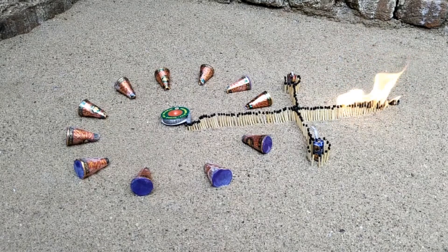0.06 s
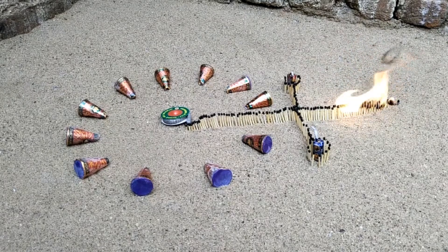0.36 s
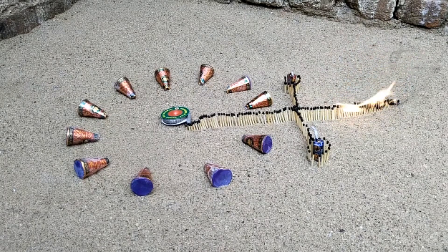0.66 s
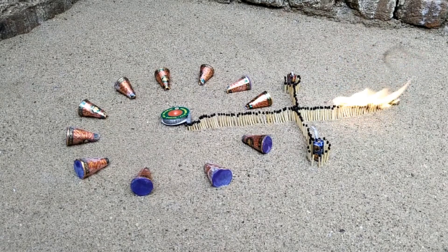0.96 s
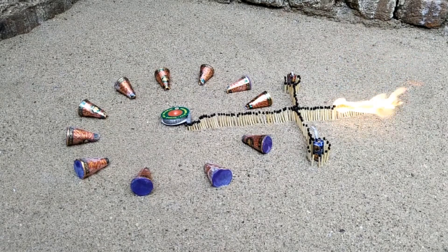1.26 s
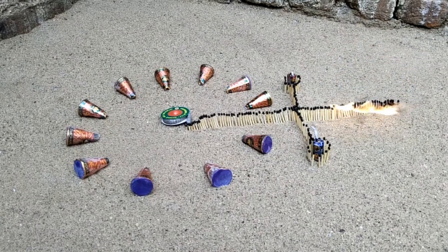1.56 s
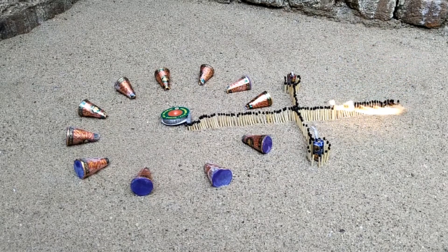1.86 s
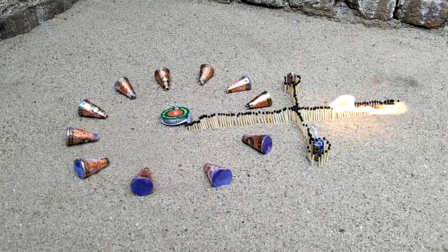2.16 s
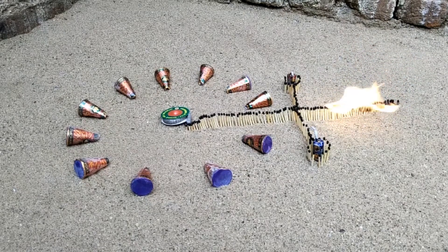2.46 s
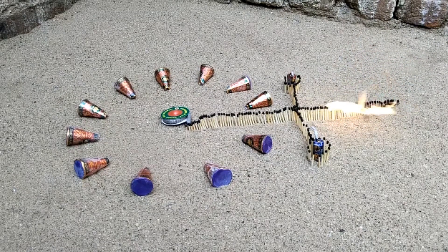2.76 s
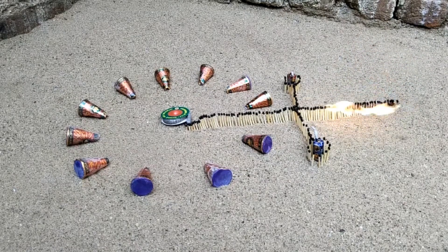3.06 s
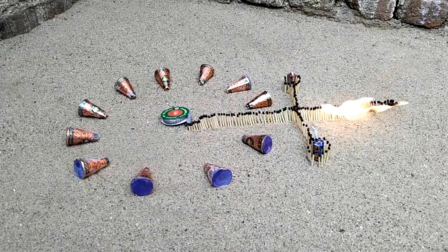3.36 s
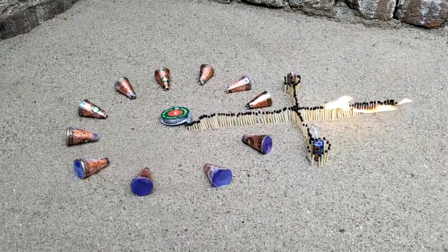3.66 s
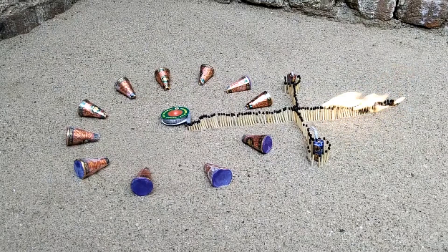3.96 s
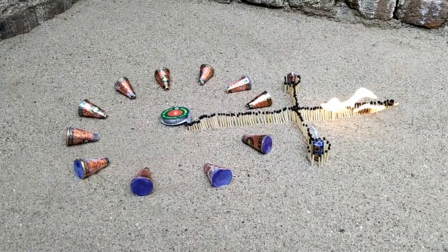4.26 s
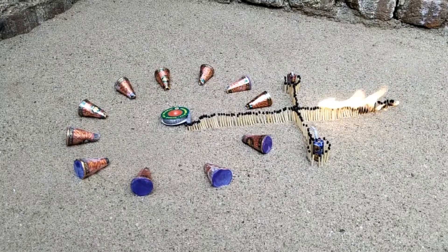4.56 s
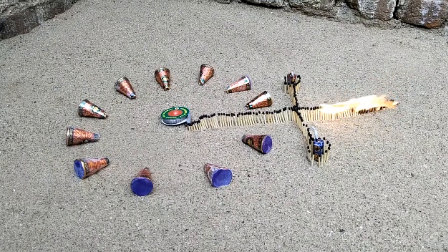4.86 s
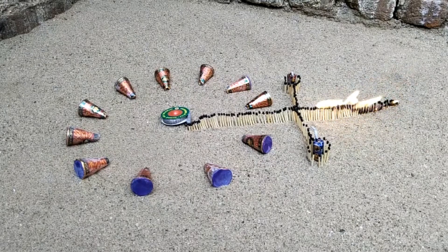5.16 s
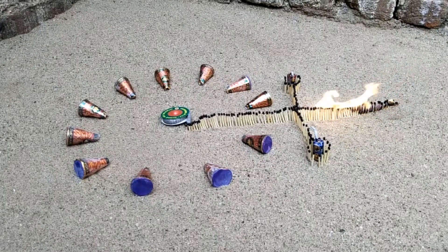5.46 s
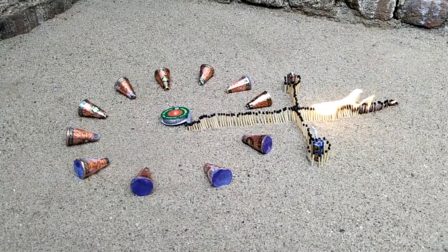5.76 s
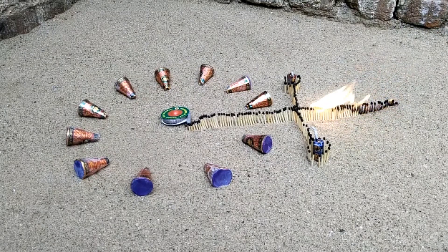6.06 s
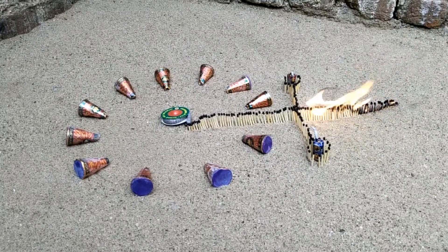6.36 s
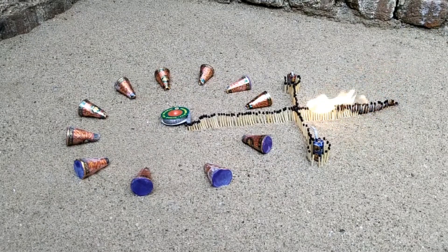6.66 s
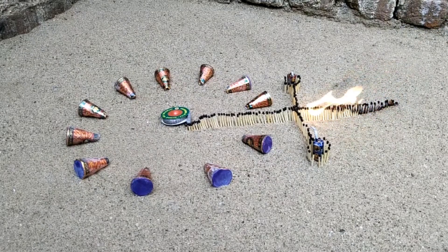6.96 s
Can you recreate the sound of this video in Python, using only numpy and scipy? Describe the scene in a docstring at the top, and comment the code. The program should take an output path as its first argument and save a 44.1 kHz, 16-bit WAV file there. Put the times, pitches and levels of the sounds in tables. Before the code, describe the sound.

A row of matches burns along on sand outdoors. Each head catches with a small whoosh and a bright, fluttering fizz, then fades as the next one flares, about twice a second. Short spurts of gas, sharp little snaps and a few faint, very brief whistles break up the hiss. The snaps grow more frequent in the second half. A light wind rumbles on the nearby microphone throughout.

```python
"""Match heads flare and fizz one after another, a row of them burning along on sand, outdoors.
Each flaring head blows a jet of gas while its coating boils off in tiny bursts; pockets of gas
spurt out, cracks whistle and crusts snap. The sand and hard surfaces close by add early echoes.
A light wind rumbles underneath, and the microphone's port rings near 9 kHz."""
import sys
import numpy as np
from scipy import signal
from scipy.fft import rfft, irfft
from scipy.io import wavfile
from scipy.ndimage import map_coordinates

SR = 44100
rng = np.random.default_rng(int(sys.argv[2]) if len(sys.argv) > 2 else 0)


def generate_wav(signal):
    """Clip the signal to [-1, 1] and save it as 16-bit WAV at the path in sys.argv[1]."""
    frames = np.transpose(np.atleast_2d(signal))
    scaled = np.clip(frames, -1, 1) * 32767
    pcm = np.round(scaled).astype(np.int16)
    wavfile.write(sys.argv[1], SR, pcm)


N = 309582
TIME = np.arange(N) / SR

# The open air around the microphone. Each row: frequency in Hz, relative level in dB.
AIR_SPECTRUM = [(8, 1.5), (14, 0), (24, 0), (38, -4.5), (60, -11.5), (90, -13), (160, -16), (300, -18),
                (700, -29.5), (2000, -39.5), (6000, -46.5), (16000, -56)]
# Gusts of the breeze. Each row: centre in seconds, half length in seconds, lift in dB.
WIND_GUSTS = [(0.604, 0.064, 5), (1.04, 0.2, 8), (2.465, 0.11, 5.5), (3.015, 0.13, 3.5), (4.7, 0.068, 1.5),
              (5.68, 0.055, 5.5)]
# Echo paths to the microphone, shifting as the flame travels. Each row: time in seconds,
# delay off the sand in ms, then the delays off three hard surfaces close by in ms.
ECHO_DELAYS = [(0, .93, 2.08, 3.05, 4.19), (1.15, .93, 2.15, 3.04, 4.2), (2.3, .935, 2.215, 3.04, 4.16),
               (4.4, .915, 2.232, 3.005, 4.185), (7, .85, 2.241, 2.935, 4.178)]
# Rough stone scatters mostly treble. Each row: frequency in Hz, relative level in dB.
STONE_SPECTRUM = [(200, -29), (1500, 1), (4000, 4.5), (8000, 1), (16000, 5.5)]
# The resonance of the microphone's port. Each row: frequency in Hz, gain in dB.
MIC_RESPONSE = [(4000, 0), (5200, 2), (6200, 7), (7300, 12), (8400, 17.5), (9200, 18.5), (10000, 12),
                (10800, 8.5), (12000, 9.5), (15500, 0.5)]

# Gas whistling through cracks.
# Each row: start in seconds, length in seconds, first pitch in Hz, last pitch in Hz, level in dB.
CRACK_WHISTLES = [(0.172, 0.025, 2370, 2440, -61.5), (2.89, 0.039, 6000, 6100, -72),
                  (3.137, 0.031, 4600, 4600, -68.5), (4.315, 0.042, 3800, 3820, -71),
                  (4.804, 0.0615, 3100, 3850, -72), (5.042, 0.023, 2810, 3100, -79)]
# Single sharp snaps of a head's crust. Each row: start in seconds, level in dB.
CRUST_SNAPS = [(0.4254, -40.3), (0.7258, -40), (0.7515, -41.4), (1.5873, -42), (1.6054, -43), (2.001, -39),
               (2.6296, -42.2), (2.7287, -40.6), (3.1405, -43), (3.4001, -37.4), (3.5685, -39.2),
               (3.9691, -38.6), (4.1, -35.4), (4.2326, -36.9), (4.2821, -35.5), (4.3166, -38.3),
               (4.3342, -41.4), (4.7127, -39.5), (4.8461, -35), (5.0381, -49), (5.0749, -47.5),
               (5.0839, -45), (5.2639, -36.8), (5.9455, -36), (5.9835, -34.7), (6.1705, -35.5),
               (6.2251, -35.4), (6.3799, -42), (6.5095, -47), (6.6751, -36.8)]
# Pockets of gas blowing out of a head. Each row: start in seconds, length in seconds, level in dB.
GAS_POCKETS = [(0.434, 0.025, -62.5), (0.525, 0.018, -61.5), (0.599, 0.009, -61.5), (0.68, 0.0073, -64.5),
               (0.717, 0.059, -65.5), (0.805, 0.043, -61.5), (1.47, 0.016, -60.5), (1.514, 0.015, -61.5),
               (1.548, 0.011, -59.5), (1.582, 0.028, -66.5), (1.667, 0.0087, -72), (1.747, .006, -72.5),
               (1.816, 0.0034, -69), (1.852, .004, -71), (1.869, .005, -65), (1.999, 0.038, -57),
               (2.701, 0.01, -55.5), (2.762, 0.013, -57.5), (2.788, .016, -59), (3.115, 0.052, -60),
               (3.185, 0.025, -62), (3.548, .02, -57), (3.603, 0.043, -62.5), (3.664, 0.0057, -56.5),
               (3.67, 0.028, -66.5), (3.718, 0.0091, -69), (3.812, .0058, -67), (4.292, 0.016, -56.5),
               (4.384, .015, -62.5), (4.411, 0.0072, -59), (4.753, 0.014, -59.5), (4.786, 0.015, -59),
               (4.817, .009, -61), (4.848, 0.023, -55), (4.903, 0.0065, -59.5), (4.92, .011, -61.5),
               (4.958, 0.0044, -61.5), (4.981, 0.0053, -60.5), (5.0, 0.022, -62.5), (5.309, 0.018, -53.5),
               (5.468, 0.0068, -56.5), (5.786, 0.027, -61.5), (6.284, .018, -61), (6.376, .01, -61),
               (6.434, 0.025, -62), (6.545, 0.012, -74.5), (6.76, .02, -57.5)]
# The heads as they catch. Each row: start, rise, hold and the jet's time to fade by 20 dB, all in
# seconds; jet, fizz and whoosh in dB; seconds from start to the boil; boil lift in dB, treble in dB.
MATCH_HEADS = [(-0.053, 0.031, 0.23, .28, -61.5, -60.5, 2.5, 0.39, 7, 3),
               (0.187, 0.086, 0.066, 0.55, -61.5, -62, -2, 0.13, -1.5, 2.8),
               (0.775, 0.099, 0.2, 0.44, -63, -60, 4, 0.17, 3.5, -0.2),
               (1.086, .108, 0.24, 0.16, -64.5, -62, 4.5, 0.24, 4, 2),
               (1.951, 0.04, 0.3, 0.45, -62, -61, 1.5, .16, 3, -5),
               (2.229, 0.077, 0.2, .5, -60.5, -59, -2.5, 0.13, 4, -1.4),
               (2.756, 0.04, .126, .4, -60, -60.5, -1.5, 0.22, -0.5, 1.5),
               (3.18, 0.054, 0.21, 0.34, -64.5, -60.5, 7, 0.15, 4, 0.5),
               (3.954, 0.03, 0.21, 0.25, -62, -57.5, 1, 0.16, 0.5, -2.5),
               (4.427, 0.038, 0.12, 0.44, -60.5, -57, -0.5, 0.23, 2.5, -1),
               (5.061, 0.071, 0.26, 0.47, -61, -59, 0, .102, 2, -3),
               (5.493, 0.084, 0.13, 0.64, -61.5, -58, 4.5, .15, 1.5, -1.7),
               (5.885, 0.072, .13, 0.04, -61.5, -57.5, 1, .128, 1.5, 0.3),
               (6.108, 0.018, 0.021, 0.42, -60.5, -58, -0.5, 0.16, 3.5, 1.9),
               (6.519, 0.057, 0.14, 0.6, -61, -59.5, 1.5, 0.27, 0, 1.5)]
# The colours of snap, spurt, fizz and gas jet. Each row: frequency in Hz, relative level in dB.
SNAP_SPECTRUM = [(100, -20), (600, -7), (3000, -4), (7000, 1), (9500, 1), (12000, -2), (16000, -5)]
SPURT_SPECTRUM = [(100, -4), (400, 2), (1500, -1.5), (4000, -2.5), (6000, -4.5), (9000, 0), (12000, -4.5),
                  (16000, 1)]
FIZZ_SPECTRUM = [(100, -14), (400, -7), (1500, -4.5), (4000, -5.5), (6000, -1), (9000, 2), (12000, -1),
                 (16000, -0.5)]
JET_SPECTRUM = [(60, -26), (140, 0.5), (220, 2.5), (400, 4), (700, 3), (1000, -0.2), (1300, -.5),
                (2200, -2.5), (3000, -3.5), (4200, -10.5), (7000, -16), (16000, -41)]


def gain_of(db):
    """Decibels to amplitude."""
    return 10 ** (np.asarray(db) / 20)


def unit_rms(x):
    """Scales to an rms of one."""
    return x / np.sqrt(np.mean(x ** 2) + 1e-20)


def curves(rows):
    """Every column of a time table, at each sample."""
    times, *columns = np.transpose(rows)
    return [np.interp(TIME, times, column) for column in columns]


def add(mix, start, sound):
    """Lays a sound into the mix at a start in seconds."""
    part = mix[max(round(start * SR), 0):][:len(sound)]
    part += sound[:len(part)]


def impulse_response(spectrum, size=8192):
    """The causal impulse response that has a given spectrum."""
    hz, db = np.transpose(spectrum)
    bin_hz = np.fft.rfftfreq(size, 1 / SR)
    bin_db = np.interp(np.log(bin_hz + 1), np.log(hz), db)
    cepstrum = irfft(np.log(gain_of(bin_db)))
    cepstrum[1:size // 2] *= 2  # folded onto positive time for minimum phase
    cepstrum[size // 2 + 1:] = 0
    return irfft(np.exp(rfft(cepstrum)))[:size // 2]


def coloured(x, spectrum):
    """Gives a white sound a spectrum and keeps its power."""
    response = impulse_response(spectrum)
    return signal.oaconvolve(x, response / np.linalg.norm(response))[:N]


def filtered(x, order, hz, kind="low"):
    """A Butterworth filter."""
    return signal.sosfiltfilt(signal.butter(order, hz, kind, fs=SR, output="sos"), x)  # zero phase


def wander(low_hz, high_hz):
    """Random motion of rms one between two rates."""
    hz = np.fft.rfftfreq(N, 1 / SR)
    shape = hz / np.hypot(hz, low_hz) / (1 + (hz / high_hz) ** 2)
    return unit_rms(irfft(rfft(rng.standard_normal(N)) * shape, N))


def bursts(per_s, spread_db):
    """Tiny pops at random moments, mostly small and a few large; rms one."""
    size = gain_of(spread_db * np.minimum(rng.exponential(1, N), 4))
    return unit_rms(size * rng.choice([-1, 1], N) * (rng.random(N) < per_s / SR))


def wind(breeze_db=-63, air_db=-70.5):
    """A light breeze at the microphone: a lumpy rumble that swells in gusts, over quiet outdoor air."""
    gust_db = sum(db * np.exp(-((TIME - centre) / half) ** 4) for centre, half, db in WIND_GUSTS)
    air = coloured(rng.standard_normal(N), AIR_SPECTRUM)
    rumble = filtered(air, 2, hz=90)
    lumps_db = 1.5 * wander(low_hz=2.8, high_hz=20)
    return rumble * gain_of(breeze_db + gust_db + lumps_db) + gain_of(air_db) * (air - rumble)


def surroundings(direct, echo_db=(-17, -8.5, -12, -14), scatter_db=-8.5, scatter_t60_s=0.066):
    """The sand and three near surfaces comb the sound, and rough stone scatters a short faint tail."""
    low = filtered(direct, 1, hz=4200)
    reflected = low + 0.39 * (direct - low)  # the echoes come back duller
    out = direct.copy()
    for delay_ms, db in zip(curves(ECHO_DELAYS), echo_db):
        source_time = TIME - delay_ms / 1000
        out += gain_of(db) * map_coordinates(reflected, [source_time * SR], order=3)
    t = TIME[:SR // 4]
    tail = rng.standard_normal(len(t)) * np.exp(-np.log(1000) * t / scatter_t60_s) * (t > 0.003)
    scattered = signal.oaconvolve(direct, tail / np.linalg.norm(tail))
    return out + gain_of(scatter_db) * coloured(scattered, STONE_SPECTRUM)


def whistles(waver=0.038):
    """Gas squeezes through cracks in thin unsteady tones; most rise a little as the crack blows out."""
    out = np.zeros(N)
    unsteady = 1 + waver * wander(low_hz=40, high_hz=300)
    for start, length, first_hz, last_hz, db in CRACK_WHISTLES:
        glide_hz = np.linspace(first_hz, last_hz, round(length * SR))
        hz = glide_hz * unsteady[round(start * SR):][:len(glide_hz)]
        tone = np.sin(2 * np.pi * np.cumsum(hz) / SR)
        add(out, start, gain_of(db) * signal.windows.tukey(len(hz), 0.5) * tone)
    return out


def snaps(fizz_db, opening_lift_db=16, ticks_per_s=14, tick_db=-45.5, crumble_s=0.0016, crumble_db=-26):
    """A crust cracks with one click, alone or as a pocket opens, and a little fizz escapes after it."""
    out, t = np.zeros(N), TIME[:500]
    openings = [(start, db + opening_lift_db) for start, _, db in GAS_POCKETS]
    alight = fizz_db > -74  # smaller snaps come at random while a head burns
    tick_times = TIME[(rng.random(N) < ticks_per_s / SR) & alight]
    ticks = [(start, tick_db + 3 * rng.standard_normal()) for start in tick_times]
    for start, db in list(CRUST_SNAPS) + openings + ticks:
        crack = gain_of(crumble_db) * rng.standard_normal(len(t)) * np.exp(-t / crumble_s)
        crack[0] = 1  # the click itself
        add(out, start, gain_of(db) * crack)
    return coloured(out, SNAP_SPECTRUM)


def spurts(open_s=0.0016):
    """Each pocket of gas opens quickly, hisses roughly while it empties, and shuts at once."""
    flow = np.zeros(N)
    for start, length, db in GAS_POCKETS:
        t = np.arange(round(2 * length * SR) + 2) / SR
        envelope = (1 - np.exp(-t / open_s)) / (1 + (t / length) ** 20)
        add(flow, start, gain_of(db) * envelope)
    hiss = bursts(per_s=14000, spread_db=2.6) * gain_of(2 * wander(low_hz=90, high_hz=400))
    return coloured(flow * hiss, SPURT_SPECTRUM)


def choking(clog_s=0.012, depth_db=-4):
    """The vent clogs just before each spurt and the flow dips; in dB."""
    dip_db = np.zeros(N)
    for start, _, _ in GAS_POCKETS:
        add(dip_db, start - clog_s, depth_db * signal.windows.tukey(round(clog_s * SR), 0.5))
    return dip_db


def head_levels(start, rise, hold, fade, jet_db, fizz_db, whoosh_db, boil_after, boil_db, treble_db,
                whoosh_s=0.062, boil_s=0.044):
    """One head's jet gain, fizz gain and treble dB: it catches, burns, boils up once and dies away."""
    t = TIME - start
    caught = np.clip(t / rise, 0, 1)
    dying = -20 * np.maximum(t - rise - hold, 0) / fade
    whoosh = whoosh_db * np.exp(-((t - rise) / whoosh_s) ** 2)  # the jet's overshoot at full flame
    boil = boil_db * np.exp(-((t - boil_after) / boil_s) ** 2)
    jet = caught * gain_of(jet_db + whoosh + 0.84 * boil + dying)  # partly follows the boil
    fizz = caught * gain_of(fizz_db + boil + 1.31 * dying)  # dies faster than the jet
    return jet, fizz, treble_db + 0.69 * boil  # a hard boil fizzes brighter


def row_levels(smoulder_jet_db=-86.5, smoulder_fizz_db=-90):
    """Jet, fizz and treble in dB of all heads over the smouldering sticks; loud fizz leads the treble."""
    jet_power, fizz_power = gain_of(smoulder_jet_db) ** 2, gain_of(smoulder_fizz_db) ** 2
    weighted_treble = 0
    for head in MATCH_HEADS:
        jet, fizz, treble_db = head_levels(*head)
        jet_power += jet ** 2
        fizz_power += fizz ** 2
        weighted_treble += treble_db * fizz ** 2
    return 10 * np.log10(jet_power), 10 * np.log10(fizz_power), weighted_treble / fizz_power


def head_colour(x, treble_db):
    """The top treble flickers and follows the burning head's colour; the hiss below follows a little."""
    top = filtered(x, 3, hz=10500, kind="high")
    hiss = filtered(x, 2, hz=[2800, 7500], kind="band")
    top_db = treble_db - 2 + 2.3 * wander(low_hz=2.6, high_hz=4.1)
    hiss_db = 0.16 + 0.22 * treble_db
    return x + top * (gain_of(top_db) - 1) + hiss * (gain_of(hiss_db) - 1)


def flares(jet_db, fizz_db, weak_flutter_db=3, strong_flutter_db=1.56):
    """Gas rushes from the heads while their coating boils off in pops; a weak flame flutters more."""
    depth_db = np.interp(fizz_db, [-70, -58], [weak_flutter_db, strong_flutter_db])
    flutter_db = depth_db * wander(low_hz=4.7, high_hz=66.6)
    flutter_db -= depth_db ** 2 * np.log(10) / 20  # offsets the power that fluttering adds
    choke_db = choking()
    gas = rng.standard_normal(N) + gain_of(-9) * bursts(per_s=1600, spread_db=4.0)
    jet = coloured(gas * gain_of(jet_db + 0.93 * flutter_db + choke_db - 0.5), JET_SPECTRUM)
    pops = bursts(per_s=12000, spread_db=2.4) + gain_of(-8) * bursts(per_s=450, spread_db=2.8)
    fizz = coloured(pops * gain_of(fizz_db + flutter_db + choke_db + 0.32), FIZZ_SPECTRUM)
    return jet + fizz


def scene():
    """What reaches the microphone: the matches on the sand, their close echoes, and the wind."""
    jet_db, fizz_db, treble_db = row_levels()
    burning = flares(jet_db, fizz_db) + spurts() + snaps(fizz_db)
    fire = head_colour(burning, treble_db) + whistles()
    return (gain_of(-1.1) * surroundings(fire) + wind())[None]


def record(dry, hiss_db=-82, band_limit_hz=15750):
    """One microphone: its port rings, the preamplifier adds a faint even hiss, and the top is cut off."""
    at_capsule = signal.oaconvolve(dry, impulse_response(MIC_RESPONSE)[None])[:, :N]
    amplified = at_capsule + gain_of(hiss_db) * rng.standard_normal(N)
    lowpass = signal.firwin(511, band_limit_hz, window=("kaiser", 9), fs=SR)
    return signal.oaconvolve(amplified, lowpass[None], "same")


dry = scene()
out = record(dry)
generate_wav(out)
```